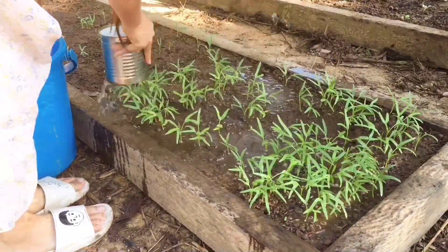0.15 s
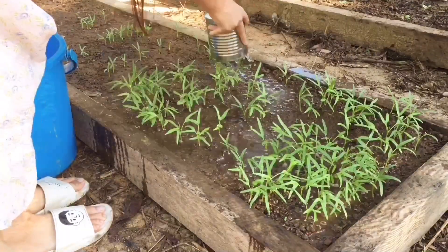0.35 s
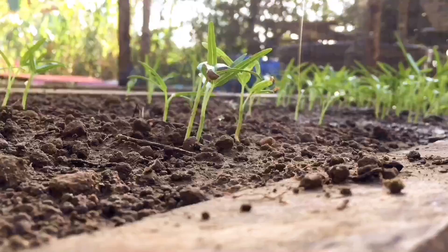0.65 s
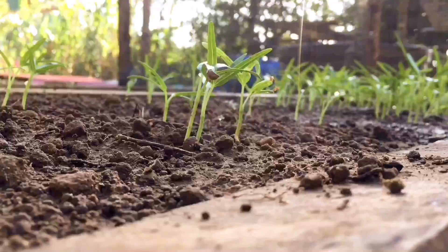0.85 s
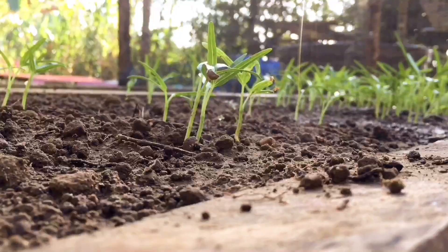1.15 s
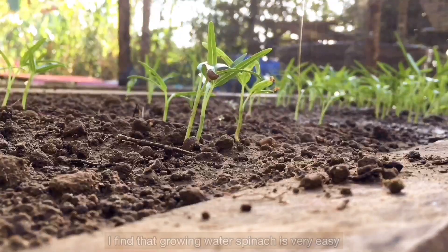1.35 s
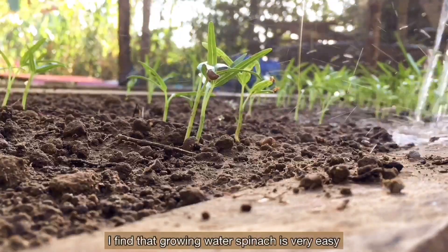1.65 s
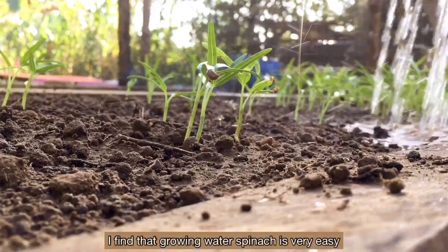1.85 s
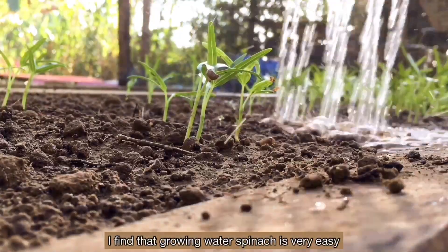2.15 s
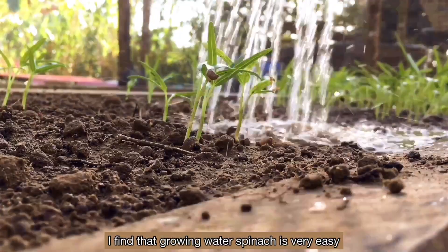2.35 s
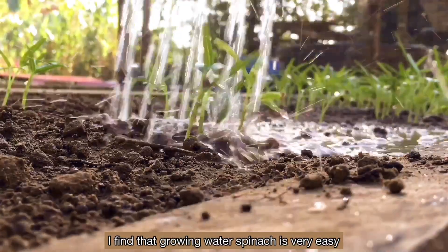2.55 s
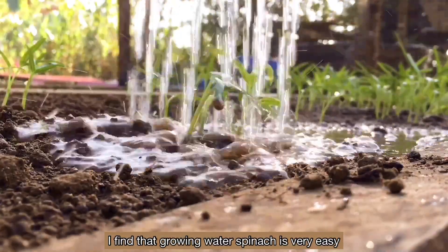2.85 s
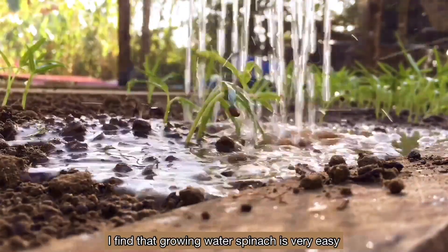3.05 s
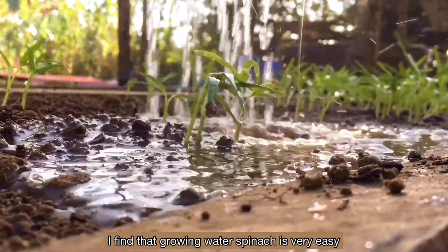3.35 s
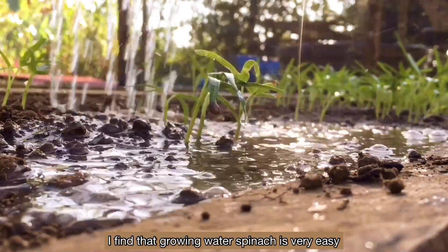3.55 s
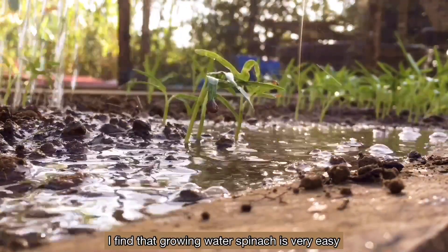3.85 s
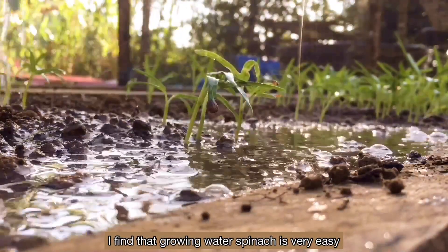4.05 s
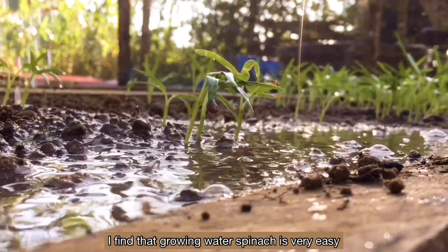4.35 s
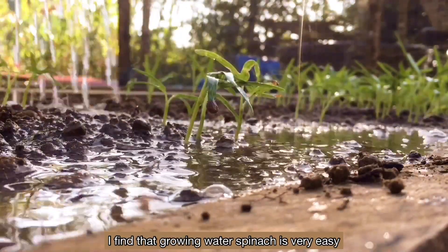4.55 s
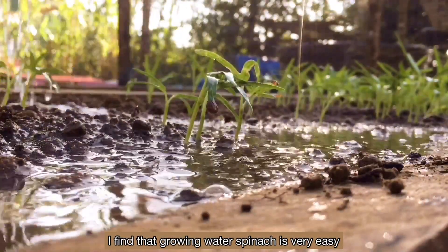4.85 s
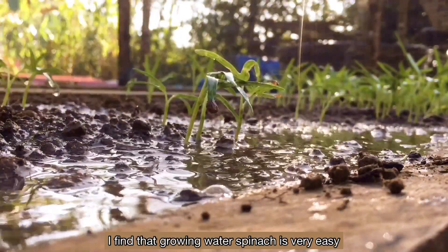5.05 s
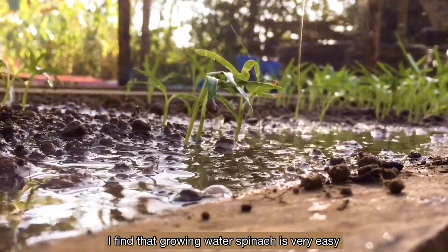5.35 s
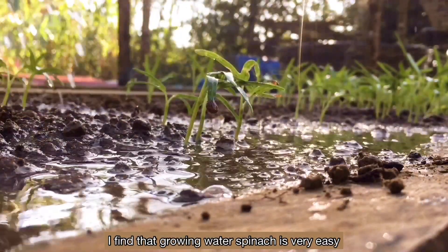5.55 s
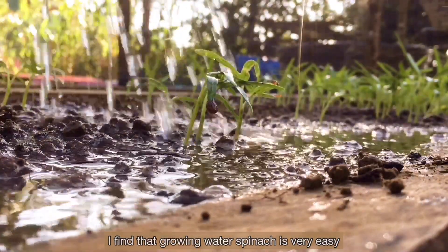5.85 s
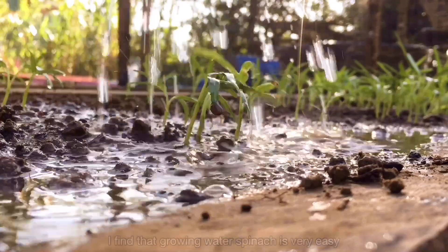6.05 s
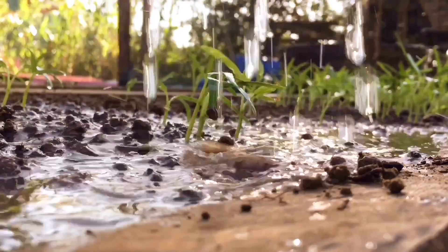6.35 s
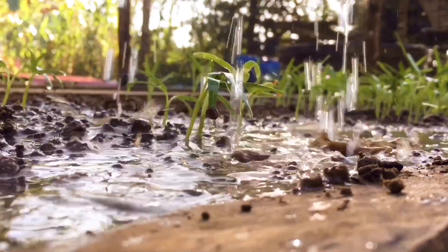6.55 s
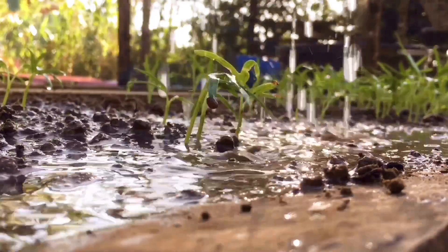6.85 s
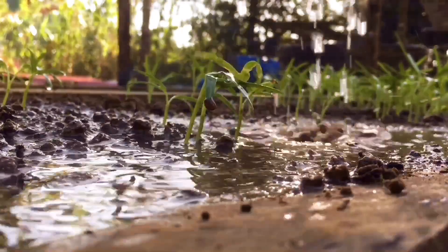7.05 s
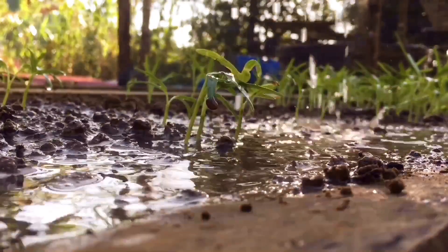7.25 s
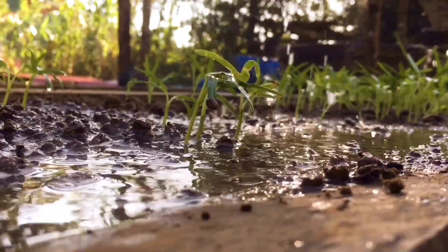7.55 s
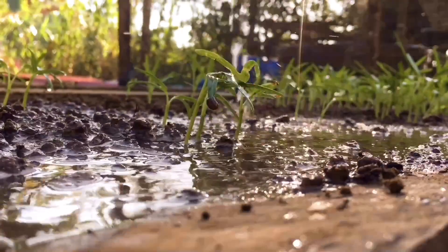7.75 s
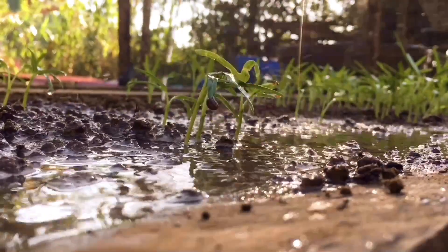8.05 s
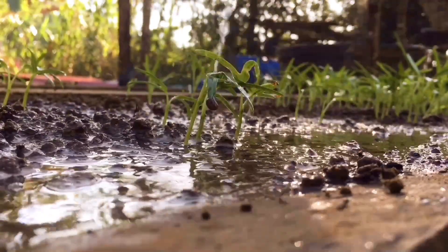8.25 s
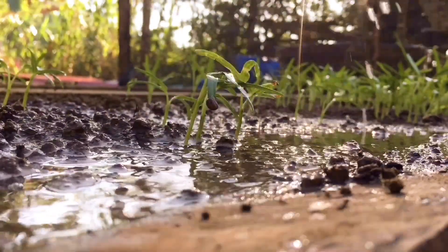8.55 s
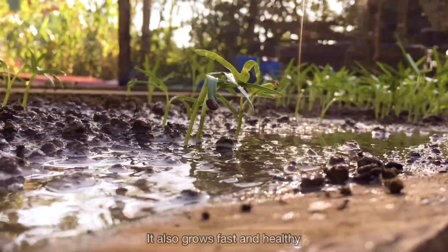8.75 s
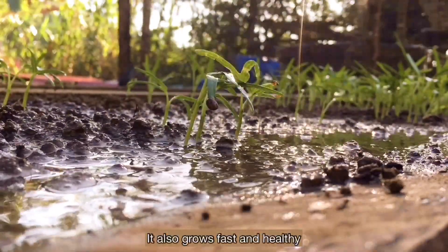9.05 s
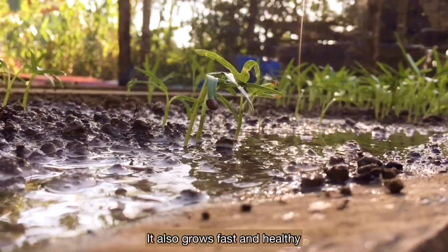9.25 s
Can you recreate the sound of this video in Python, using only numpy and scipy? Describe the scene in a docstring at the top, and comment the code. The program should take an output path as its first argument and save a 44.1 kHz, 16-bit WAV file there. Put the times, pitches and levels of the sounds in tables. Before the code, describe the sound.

Water glugs into a perforated can and rains onto a puddled seed bed, thinning to drips before the can knocks a barrel.

```python
"""A low tone sinks in thin outdoor air for half a second; then the scene changes to a garden with fuller air,
insects and a hum. A perforated tin can plunges into water and fills, gurgling as its air escapes. It then rains
on a wet seed bed close by: drops crack, trap rising bubbles and spatter. As the flow thins, birds coo and
whistle far off. At the end the can knocks on a barrel and sets it ringing."""
import sys
import numpy as np
from scipy import signal
from scipy.fft import rfft, irfft, next_fast_len
from scipy.io import wavfile
from scipy.ndimage import uniform_filter1d, map_coordinates

SR = 44100
rng = np.random.default_rng(int(sys.argv[2]) if len(sys.argv) > 2 else 0)


def wrap_up_sound(samples):
    """Save the sound to the file named by the first command line argument, as 16-bit audio."""
    columns = np.atleast_2d(samples).T
    # keep every value between -1 and 1, then stretch to whole-number steps
    tamed = np.clip(columns, -1, 1)
    steps = np.round(tamed * 32767).astype(np.int16)
    wavfile.write(sys.argv[1], SR, steps)


N = 414080

# Flow from the can. Each row: time in seconds, pour strength in dB, fat-drop level in dB.
POUR = [(0.75, -57.5, -70), (1.17, -43.5, -42), (1.65, -41, -19.5), (1.84, -32.5, -7), (2.0, -29, -22),
        (2.7, -33.5, -8.5), (3.07, -34.5, -24), (3.42, -31.5, -11), (3.68, -43.5, -7), (3.87, -38, -38),
        (4.02, -45, -21), (4.46, -47, -27), (4.83, -41.5, -28), (5.1, -50.5, -14), (5.5, -59.5, -37),
        (5.9, -54.5, -29), (6.42, -52, -35), (7.2, -61.5, -28), (7.5, -62, -31), (8.3, -58, -30),
        (8.5, -66, -47), (9.39, -76, -59)]
# Loudest drops. Each row: start in seconds, level in dB, nominal pitch in Hz.
LOUD_DROPS = [(0.9584, -24, 5900), (1.403, -17.5, 8400), (1.627, -36, 6000), (1.6515, -12.5, 5960),
              (1.6674, 0.5, 6700), (1.743, -7.5, 8550), (1.8335, -2.5, 5940), (1.863, -11, 6000),
              (2.027, -8, 5560), (2.1146, -5, 4870), (2.2832, -11.5, 9300), (2.5646, -9, 2550),
              (2.655, -6, 11000), (2.845, -10.5, 10600), (2.9112, -2, 4050), (2.921, -10, 8000),
              (2.9482, -9.5, 7220), (3.0504, -6.5, 8000), (3.255, -13, 9600), (3.3562, -15, 8120),
              (3.457, -10.5, 3080), (3.54, -6.5, 8600), (3.581, -16.5, 1910), (3.6454, -10, 5460),
              (3.7726, -15, 6200), (3.855, -18, 6840), (3.9196, -14.5, 2290), (3.99, -18.5, 9800),
              (4.0142, -19.5, 4440), (4.067, -22.5, 3800), (4.197, -21.5, 4040), (4.233, -17, 9900),
              (4.2667, -19, 9800), (4.301, -17, 9900), (4.339, -25, 9700), (4.347, -24.5, 3940),
              (4.398, -13.5, 9650), (4.4288, -20, 2660), (4.613, -16.5, 12000), (4.704, -18.5, 5900),
              (4.7595, -14, 4450), (4.9107, -26, 9800), (4.9368, -14, 5600), (5.0554, -24, 5200),
              (5.2695, -22.5, 3280), (5.417, -22.5, 7100), (5.479, -23, 5740), (5.7253, -21.5, 9500),
              (5.792, -18, 4400), (5.9637, -14.5, 7160), (6.004, -24, 7050), (6.037, -20.5, 6600),
              (6.083, -27.5, 8370), (6.189, -29, 11100), (6.234, -22, 5570), (6.255, -19, 4630),
              (6.267, -23, 9600), (6.352, -16.5, 7300), (6.368, -24, 9500), (6.3784, -21, 8360),
              (6.421, -21, 9150), (6.433, -25, 11500), (6.53, -23.5, 13600), (6.5974, -14, 8500),
              (6.631, -24, 12500), (6.71, -23, 6800), (6.8153, -23, 7940), (6.826, -14.5, 9000),
              (6.838, -25, 9500), (6.8996, -15.5, 7900), (6.907, -24, 6000), (6.95, -15.5, 3970),
              (7.0114, -6.5, 5340), (7.0768, -25, 12300), (7.095, -20.5, 8300), (7.1191, -12, 6260),
              (7.122, -17, 6340), (7.172, -20, 5900), (7.185, -22, 6500), (7.241, -26, 10000),
              (7.2525, -29, 13500), (7.7566, -24.5, 9510), (7.866, -22.5, 8600), (7.915, -22.5, 9300),
              (7.961, -16.5, 13400), (8.058, -23.5, 3970), (8.2677, -39, 3270), (8.2882, -28, 6100),
              (8.3325, -35, 3000)]
# Heavy drops into the puddle. Each row: start in seconds, level in dB, pitch in Hz.
PUDDLE_PLOPS = [(1.731, -18, 166), (1.988, -10.5, 1850), (2.1128, -12, 2350), (2.1846, -17, 2340),
                (2.2286, -20, 1820), (2.297, -12, 2190), (2.4475, -16, 2270), (2.478, -13, 2420),
                (2.511, -16, 1930), (2.5398, -16, 1850), (2.61, -18, 1550), (2.776, -21.5, 765),
                (2.8258, -13.5, 2250), (2.861, -18, 1720), (2.9117, -6, 2840), (3.222, -21, 1590),
                (3.288, -22, 1030), (3.303, -17, 2150), (3.432, -21, 1320), (3.49, -18.5, 1580),
                (3.794, -15.5, 2670), (3.8233, -22, 1940), (3.8655, -25, 2900), (3.876, -18, 2730),
                (4.113, -25.5, 2470), (4.387, -24, 2530), (4.429, -24, 920), (4.431, -16.5, 1780),
                (5.283, -26.5, 2430), (6.099, -28.5, 794), (6.418, -32, 700), (6.441, -31, 980),
                (6.584, -33, 700), (6.948, -18.5, 820), (7.646, -34, 2180), (7.961, -28.5, 814),
                (7.988, -31, 840)]
# Spectra of spray, drumming bed and sloshing water. Each row: frequency in Hz, gain in dB.
SPRAY_EQ = [(300, -34), (800, 5), (1300, 1), (2400, 2), (4000, 3), (6000, 6), (9000, 8), (13000, 9.5),
            (16000, 2.5)]
BED_EQ = [(90, -12), (165, 5.5), (240, -5), (400, -5), (800, -14), (1200, -46)]
SLOSH_EQ = [(70, -9), (170, -2.5), (300, -0.5), (560, -2), (820, 2.5), (1200, -13.5), (1500, -25.5),
            (2250, -9), (2900, -18), (9000, -31.5), (16000, -56)]
# Filling. Each row: time in seconds, gurgle level in dB, can boom level in dB.
FILL_LEVELS = [(0.5, -64, -57), (0.55, -45, -28), (0.73, -35.5, -41), (0.78, -40.5, -48),
               (0.95, -35, -46.5), (1.06, -34.5, -32.5), (1.3, -33.5, -40), (1.47, -37, -44),
               (1.8, -46, -48)]
# Big air bubbles. Each row: start in seconds, level in dB, pitch in Hz, relative slap in dB.
AIR_GLUGS = [(0.552, -4.5, 569, -1), (0.623, -18, 632, -24), (0.697, -10.5, 695, -1.5),
             (0.736, -5.5, 1002, -34), (0.781, -20, 750, -26), (0.839, -8.5, 754, 4), (0.902, -14, 700, 1),
             (1.012, -8, 674, 2), (1.055, -13.5, 1000, -1), (1.067, -7, 592, -31),
             (1.255, -15.5, 1170, -15), (1.295, -13.5, 640, -25), (1.339, -13, 794, -3),
             (1.559, -17.5, 573, -18), (1.674, -6, 879, -32)]
# Can on barrel. Each row: start in seconds, level in dB, scrape length in seconds,
# relative crack in dB, brightness in dB per octave.
BLOWS = [(8.85, -40.5, 0.012, -30, 6.5), (8.925, -48, 0.0091, -30, 2), (8.989, -44.5, 0.012, -25, 2.5),
         (9.155, -48, 0.01, 3, 7), (9.183, -21, 0.0078, -27, 5), (9.188, -18.5, 0.012, -24, -3.5),
         (9.284, -28, 0.0083, -19, 3), (9.322, -20, 0.0088, -6, 1.6)]
# Barrel modes. Each row: frequency in Hz, level in dB, T60 in seconds.
BARREL_MODES = [(51, -13, 0.58), (238, 6.5, 0.056), (316, 6, 0.039), (590, 1.5, 0.01), (760, -4, 0.03),
                (890, -7.5, 0.017), (1030, -21, 0.011), (1820, -8, 0.0023), (2300, -34, 0.011)]
# Bird notes. Each row: start in seconds, length in seconds, first pitch in Hz, target pitch in Hz,
# glide time over note length, level in dB, relative echo in dB.
BIRD_NOTES = [(0.015, .115, 4020, 4400, 1.6, -57, -10), (5.347, .06, 2520, 1900, 1, -54, -5),
              (5.61, .09, 2550, 1350, 1, -54, -4), (5.62, .07, 2820, 2780, 1, -59, -8),
              (5.805, .06, 3400, 3380, 1, -57, -6), (5.89, .085, 2550, 1400, 1, -53.5, -4),
              (6.09, .05, 3400, 3380, 1, -59, -6), (6.16, .1, 2550, 1300, 1, -52, -5),
              (6.37, .035, 2150, 2450, 1, -58, -6), (7.68, .15, 3320, 3200, 1, -58, 0),
              (8.05, .07, 3450, 4570, .55, -45.5, 3), (8.27, .03, 3250, 3150, 1, -54, 0),
              (8.385, .1, 2850, 4080, .7, -48, 2), (8.625, .055, 3400, 4300, .6, -47, 2),
              (9.005, .035, 1040, 1080, 1, -47, -9), (9.03, .05, 840, 900, 1, -44, -5),
              (9.115, .025, 1030, 1100, 1, -46, -9)]
# Spectra of the garden air and the thinner opening air. Each row: frequency in Hz, gain in dB.
GARDEN_EQ = [(12, -28), (20, -2), (71, 0), (230, -9), (289, -13), (452, -18.5), (566, -21), (652, -17.5),
             (1470, -28), (4280, -28.5), (4790, -33), (5520, -30.5), (7950, -36), (15200, -38.5),
             (16500, -18.5)]
OPENING_EQ = [(24, -87), (40, -44), (141, -12.5), (233, -6.5), (300, -13.5), (427, -16.5), (564, -22.5),
              (1990, -27), (4020, -37), (14900, -39), (16500, -58)]
# Insects and far hum. Each row: centre in Hz, width in Hz, level in dB.
INSECT_BANDS = [(3200, 110, -72.5), (4520, 190, -73.5), (5380, 200, -72), (7640, 1400, -69.5)]
HUM_BANDS = [(289.3, 6.9, -63.5), (562, 64, -66.5)]
# Sinking low tone. Each row: time in seconds, pitch in Hz, level in dB.
LOW_TONE = [(0.0, 280.5, -45.5), (0.092, 275, -59), (0.218, 242.3, -44.5), (0.344, 193, -51.5),
            (0.478, 204.6, -49), (0.52, 167.6, -57)]
# Overall tone colour. Each row: frequency in Hz, gain in dB.
OUTPUT_EQ = [(20, -15), (45, 2), (4300, 4.5), (4900, 2.5), (5500, 5), (9600, 4), (10400, -1), (11200, 2)]

GARDEN_START_S, POUR_START_S, DRIBBLE_DB = 0.522, 1.6, -9
FAT_PER_S, FAT_SPREAD_DB = 16, 10
FAT_LOW_HZ, FAT_HIGH_HZ, FAT_RISE_HZ_PER_DB = 2700, 12700, 142
TIN_HZ, TIN_WIDTH_HZ, TIN_SWING_DB, TIN_FADE_START_S = 2330, 130, 4, 2.1
PLUNGE_PEAK_S, PLUNGE_DB, PLUNGE_ATTACK_S, PLUNGE_T60_S = 0.556, -23.5, 0.023, 0.32
CHURN_DB, HEAVE_SWING_DB = 2.5, 3
COO_START_S, COO_GAP_S, COO_HURRY_S, COO_COUNT = 3.745, 0.519, 0.0016, 10
COO_FIRST_DB, COO_STEP_DB, COO_ECHO_DB = -60, 0.99, -1.5
TOP_HZ = 15900


def shower():
    """Drops hit the bed, hiss far off and drum on the soil; the draining can rings."""
    pour_db, fat_db = curves(POUR)
    flow_db = pour_db - pour_db.max()  # 0 at full pour
    s, db, hz = np.hstack([np.transpose(LOUD_DROPS), fat_drops(fat_db)])
    big = splats(s, amp(db), hz, crack_db=-3.5, bubble_db=-6.5, spray_db=-11, mist_db=-19.5)
    small = small_drops(flow_db)
    hiss = amp(-42.5 + 0.99 * flow_db + 3.4 * wobble(50) + 3.3 * wobble(11)) * rng.standard_normal(N)
    direct = coloured(big + small + hiss, SPRAY_EQ) + plops()
    drumming = amp(1.65 * flow_db - 42.5 + 1.8 * wobble(23.9)) * rush(BED_EQ, patchy_db=1.5)
    fade_db = -20 * np.clip(np.arange(N) / SR - TIN_FADE_START_S, 0, 4)
    direct += tin_ring(2 * flow_db + fade_db - 50.5, flicker_hz=40.3)
    return direct + amp(-15) * echoes(direct, t60_s=0.1) + drumming


def fat_drops(level_db):
    """Times, levels and pitches of random fat drops; smaller drops trap higher bubbles."""
    u = rng.random((round(FAT_PER_S * N / SR), 3))
    at = (400 + u[:, 0] * (N - 800)).astype(int)
    low_hz = np.minimum(FAT_LOW_HZ + FAT_RISE_HZ_PER_DB * (level_db.max() - level_db[at]), FAT_HIGH_HZ)
    return at / SR, level_db[at] - FAT_SPREAD_DB * u[:, 1], low_hz * (FAT_HIGH_HZ / low_hz) ** u[:, 2]


def small_drops(flow_db):
    """Small drops grow in number and strength with the flow; a trickle traps only high bubbles."""
    u = rng.random((4000, 4))
    at = (400 + u[:, 0] * (N - 800)).astype(int)
    falls = np.clip((0.865 * amp(0.574 * flow_db[at]) - u[:, 1]) * 30, 0, 1) * (at > POUR[0][0] * SR)
    db = DRIBBLE_DB * (at < POUR_START_S * SR) - 31 + 0.52 * flow_db[at] + 14.05 * u[:, 2] ** 2
    hz = 1602 - 90 * flow_db[at] + 10000 * u[:, 3] ** 1.46
    return splats(at / SR, falls * amp(db), hz, crack_db=0.5, bubble_db=-2, spray_db=-6, mist_db=-10)


def splats(s, gain, hz, crack_db, bubble_db, spray_db, mist_db):
    """Each drop cracks and traps a rising bubble; droplets land around it in a dying mist."""
    u = rng.random((len(s), 15))
    crack_hz = np.minimum(hz * (1 + 0.87 * u[:, 0]), 13000)
    out = amp(crack_db) * bubbles(s, crack_hz, gain, 2.55, 0, size=48, onset=0.16)
    trap_s, cycles, rise = s + 0.003 * u[:, 2] ** 2, 3 + 0.0016 * hz * u[:, 1], 0.47 * u[:, 2]
    out += amp(bubble_db) * bubbles(trap_s, hz / 1.125, gain, cycles, rise, size=200, onset=0.043)
    lag = u[:, 3:9] - 0.38
    spray_s = s[:, None] + 0.011 * lag
    spray_gain = gain[:, None] * amp(spray_db - 56 * np.abs(lag))
    spray_hz = np.clip(hz[:, None] * 3 ** (u[:, 9:] - 0.2), 2500, 15000)
    out += bubbles(spray_s.ravel(), spray_hz.ravel(), spray_gain.ravel(), 4.6, 1, size=60)
    energy = np.bincount(np.round(s * SR).astype(int), gain ** 2, N)[:N]
    decay = amp(-120 * np.arange(2000) / SR / 0.0048)
    mist = np.sqrt(np.abs(signal.fftconvolve(energy, decay)[:N]))
    return out + amp(mist_db) * mist * np.diff(rng.standard_normal(N + 1))


def plops():
    """Heavy drops slap the puddle's surface and plop."""
    s, db, hz = np.transpose(PUDDLE_PLOPS)
    plop = bubbles(s, hz, amp(db), 1.75 + 0.0014 * hz, 0.097, size=1000, onset=0.091)
    slap = bubbles(s, 2.24 * hz, amp(db - 5), 5.4, 0, size=200, onset=0.13)
    return plop + slap


def filling():
    """The can plunges in and gurgles; its air booms, its wall rings and the water's mass heaves."""
    gurgle_db, boom_db = curves(FILL_LEVELS)
    active = (np.arange(N) > GARDEN_START_S * SR) * (np.arange(N) < FILL_LEVELS[-1][0] * SR)
    big, small = glugs(), swarm()
    water = rush(SLOSH_EQ, CHURN_DB)
    slosh = amp(-2) * small + amp(-2.5 + CHURN_DB * wobble(40.47)) * water
    slosh += tin_ring(-16, flicker_hz=30.15)
    cavity_eq = [(200, -18), (262, 3.5), (275, -5.5), (290, 2), (360, -55)]
    boom = amp(boom_db + 0.5) * unit(coloured(rng.standard_normal(N), cavity_eq))
    heave = amp(-48 + HEAVE_SWING_DB * wobble(7)) * band(56, 21)
    return big + active * (amp(gurgle_db - 4) * slosh + boom + plunge(water) + heave)


def glugs():
    """Air leaves the can in big bubbles, each with a smaller twin and a slap."""
    s, db, hz, slap_db = np.transpose(AIR_GLUGS)
    u = rng.random((len(s), 3))
    big = bubbles(s, hz, amp(db - 2), 7 + 7 * u[:, 0], 0.14 * u[:, 1], size=1800, onset=0.12)
    twin_hz = hz * (1.12 + 0.5 * u[:, 2])
    twin = bubbles(s + 0.00196, twin_hz, amp(db - 13.5), 13, 0.076, size=900, onset=0.17)
    slap = bubbles(s, 1500 + 1000 * u[:, 2], amp(db + slap_db - 4), 2.8, 0.021, size=300, onset=0.02)
    return big + twin + slap


def swarm():
    """Small bubbles ring at random while the can fills."""
    u = rng.random((1000, 3))
    s, hz = GARDEN_START_S + 1.3 * u[:, 0], 450 * 18 ** u[:, 1] ** 1.2
    fizz = bubbles(s, hz, amp(33 * u[:, 2] ** 2), 20.5, 0.058, size=1200, onset=0.028)
    fizz /= np.std(fizz[round(GARDEN_START_S * SR):round(1.8 * SR)])
    return coloured(fizz, [(300, -9.5), (1200, 7), (1500, -2.5), (2700, 2), (8000, 2)])


def plunge(water):
    """The can enters the water: a quick swell of noise, then a decay."""
    t = np.arange(N) / SR - PLUNGE_PEAK_S
    down_db = np.where(t < 0, 20 * (t / PLUNGE_ATTACK_S) ** 2, 60 * t / PLUNGE_T60_S).clip(0, 200)
    return amp(PLUNGE_DB - down_db) * coloured(water, [(1200, 2.5), (3000, -7)])


def tin_ring(db, flicker_hz):
    """The tin wall rings in one flickering band."""
    return amp(db + TIN_SWING_DB * wobble(flicker_hz)) * band(TIN_HZ, TIN_WIDTH_HZ)


def bubbles(s, hz, gain, cycles, rise, size, onset=0.0087):
    """Damped sines, size samples long; over a life of cycles, pitch climbs by the share rise."""
    s, hz, gain, cycles, rise = (
        v[gain > 0, None] for v in np.broadcast_arrays(s, hz, gain, cycles, rise))
    turns = hz * np.arange(size) / SR
    age = turns / cycles
    envelope = np.exp(-3 * age ** 0.79) * (1 - np.exp(-age / onset))
    in_band = hz * (1 + 2 * rise * age) < SR / 2
    wave = gain * envelope * in_band * np.sin(2 * np.pi * turns * (1 + rise * np.minimum(age, 1) / 2))
    at = np.round(s * SR).astype(int) + np.arange(size)
    return np.bincount(at.ravel(), wave.ravel(), N + SR)[:N]


def knocks():
    """Each blow is a short rough push that drives the barrel's modes, with a crack on top."""
    out, t = np.zeros(N + SR), np.arange(SR // 4) / SR
    for s, db, length_s, crack_db, tilt_db in BLOWS:
        ring = sum(amp(mode_db + tilt_db * np.log2(hz) - 60 * t / t60_s) * np.sin(2 * np.pi * hz * t)
                   for hz, mode_db, t60_s in BARREL_MODES)
        scrape = (0.14 + rng.standard_normal(len(t))) * np.exp(-(t / length_s) ** 4)
        body = signal.fftconvolve(scrape, ring)[:len(t)]
        crack = amp(crack_db) * uniform_filter1d(uniform_filter1d(scrape, size=5), size=4) / 2
        out[round(s * SR):][:len(t)] += amp(db) * (body / np.std(body[:1500]) + crack)
    return out[:N] + amp(-7) * echoes(out[:N], t60_s=0.18)


def birds():
    """Far whistles with echoes, and a two-part coo that repeats louder and slightly faster."""
    whistles, echo_send, coos = np.zeros((3, N + SR))
    for s, length_s, from_hz, to_hz, glide, db, echo_db in BIRD_NOTES:
        whistle = amp(db) * note(length_s, from_hz, to_hz, glide)
        whistles[round(s * SR):][:SR // 2] += whistle
        echo_send[round(s * SR):][:SR // 2] += amp(echo_db) * whistle
    for k in range(COO_COUNT):
        s = COO_START_S + k * (COO_GAP_S - k * COO_HURRY_S)
        db = COO_FIRST_DB + k * COO_STEP_DB
        coos[round(s * SR):][:SR // 2] += amp(db) * note(0.0443, 771, 882, glide=0.88)
        coos[round((s + 0.07) * SR):][:SR // 2] += amp(db - 6) * note(0.042, 923, 1015, glide=0.45)
    flutter = amp(4.4 * wobble(150))
    coos = coos[:N] * amp(4 * wobble(40))
    coos += amp(COO_ECHO_DB) * echoes(coos, t60_s=0.4)
    return whistles[:N] * flutter + coos + echoes(echo_send[:N] * flutter, t60_s=1)


def note(length_s, from_hz, to_hz, glide):
    """Whistled sine, padded to 0.5 s: a rising note levels off, a falling one slides and fades."""
    u = np.arange(round(length_s * SR)) / (length_s * SR)
    progress, rising = np.minimum(u / glide, 1), to_hz > from_hz
    hz = from_hz + (to_hz - from_hz) * (np.sin(np.pi / 2 * progress) if rising else progress)
    swell = np.sin(np.pi * u) ** 0.4 if rising else np.sin(np.pi * u ** 0.4) ** 1.6
    return np.pad(np.sin(2 * np.pi * np.cumsum(hz) / SR) * swell, (0, SR // 2 - len(u)))


def background():
    """Thin air and a wavering low tone; then the scene changes to garden air, insects and a far hum."""
    hz, db = curves(LOW_TONE)
    tone_gain = np.sqrt(2) * amp(db + 3.3 * wobble(39.5))
    tone = tone_gain * np.sin(2 * np.pi * np.cumsum(hz * (1 + 0.035 * wobble(39.8))) / SR)
    garden = amp(-46 + 0.8 * wobble(1.5)) * rush(GARDEN_EQ, patchy_db=2)
    for hz, width_hz, db in INSECT_BANDS + HUM_BANDS:
        garden += amp(db + 3.6 * wobble(7.5)) * band(hz, width_hz)
    opening = tone + amp(-49.5) * rush(OPENING_EQ, patchy_db=4)
    blend = np.clip((np.arange(N) / SR - GARDEN_START_S) / 0.0071, 0, 1)
    return blend * garden + (1 - blend) * opening


def echoes(x, t60_s):
    """Diffuse unit-energy tail off trees and fences."""
    t = np.arange(SR) / SR
    tail = unit(rng.standard_normal(SR) * amp(-60 * t / t60_s)) / np.sqrt(SR)
    return signal.fftconvolve(x, tail)[:N]


def rush(eq, patchy_db):
    """Coloured noise of rms 1 with patches of random gain."""
    spectra = signal.stft(rng.standard_normal(N), nperseg=512)[2]
    patches = uniform_filter1d(uniform_filter1d(rng.standard_normal(spectra.shape), 6, 0), 10, 1)
    noise = signal.istft(spectra * amp(patchy_db * unit(patches)), nperseg=512)[1][:N]
    return unit(coloured(noise, eq))


def band(hz, width_hz):
    """Narrow noise of rms 1."""
    m = next_fast_len(N)
    bell = np.exp(-((np.fft.rfftfreq(m, 1 / SR) - hz) / width_hz) ** 2)
    return unit(irfft(rfft(rng.standard_normal(m)) * bell, m)[:N])


def coloured(x, eq):
    """Filter x by (Hz, dB) points on a log axis."""
    m = next_fast_len(N + 8192)
    hz, db = np.transpose(eq)
    gain = amp(np.interp(np.log(np.fft.rfftfreq(m, 1 / SR) + 1), np.log(hz + 1), db))
    return irfft(rfft(x, m) * gain, m)[:N]


def wobble(rate_hz):
    """Smooth random curve, rate_hz knots a second."""
    knots = rng.standard_normal(int(N * rate_hz / SR) + 4)
    return map_coordinates(knots, [np.arange(N) * rate_hz / SR])


def curves(rows):
    """Per-sample values of each column after the time."""
    s, *columns = np.transpose(rows)
    return [np.interp(np.arange(N) / SR, s, column) for column in columns]


def amp(db):
    return 10 ** (np.asarray(db) / 20)


def unit(x):
    return x / np.sqrt(np.mean(x ** 2) + 1e-20)


def scene():
    return (filling() + shower() + knocks() + birds() + background())[None]


def record(dry):
    """Thin deep bass, two treble dips, rounded peaks, nothing above TOP_HZ."""
    m = next_fast_len(N + 8192)
    heard = coloured(dry[0], OUTPUT_EQ)
    rounded = heard / (1 + np.abs(heard) ** 6) ** (1 / 6)
    passband = np.fft.rfftfreq(m, 1 / SR) < TOP_HZ
    return 0.95 * irfft(rfft(rounded, m) * passband, m)[None, :N]


dry = scene()
out = record(dry)
wrap_up_sound(out)
```